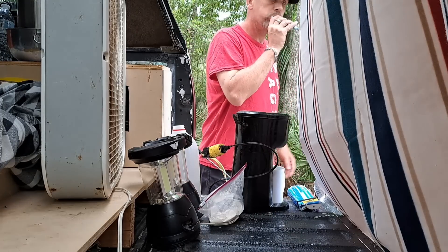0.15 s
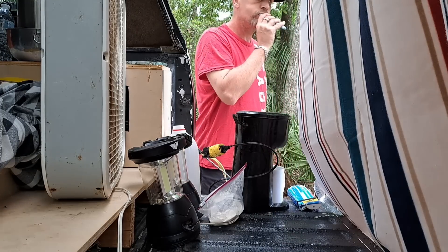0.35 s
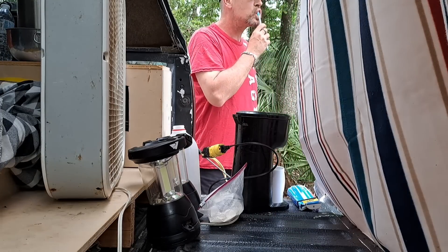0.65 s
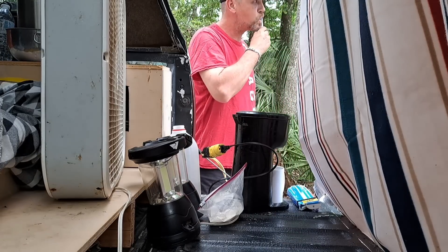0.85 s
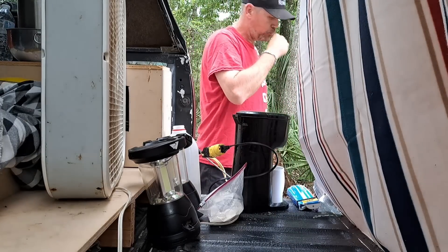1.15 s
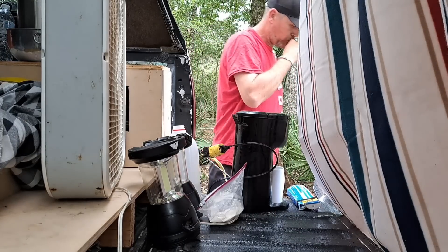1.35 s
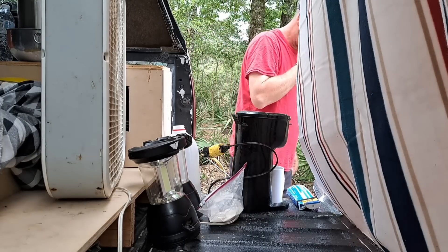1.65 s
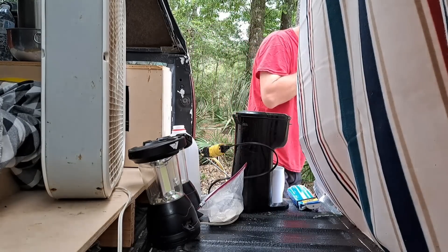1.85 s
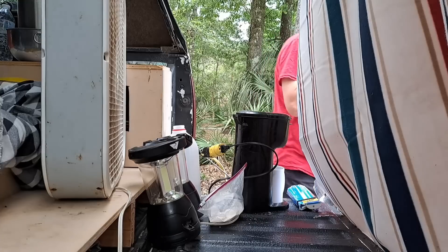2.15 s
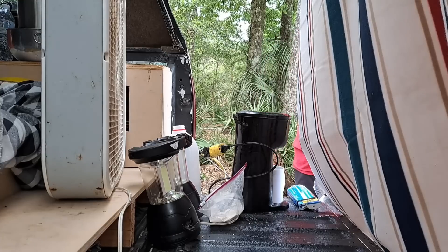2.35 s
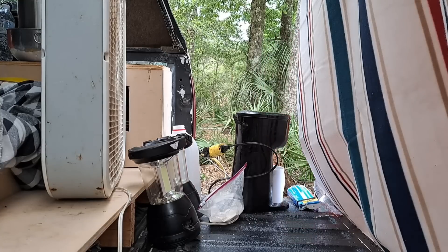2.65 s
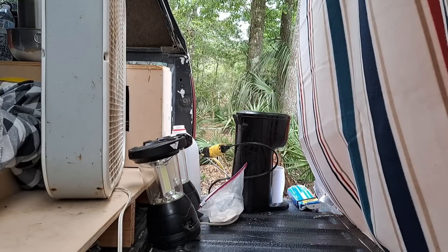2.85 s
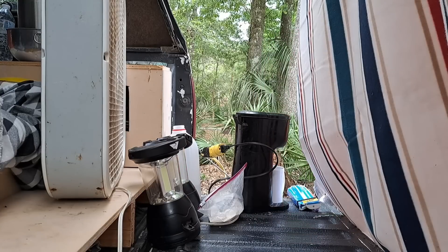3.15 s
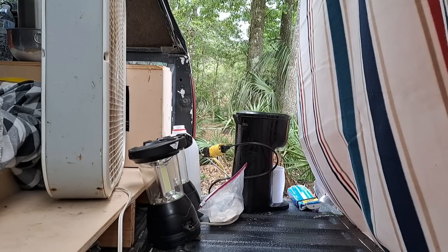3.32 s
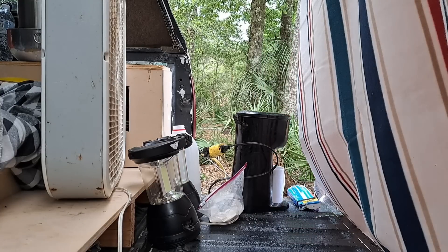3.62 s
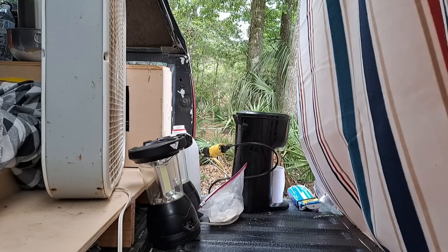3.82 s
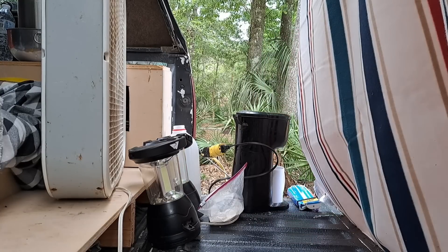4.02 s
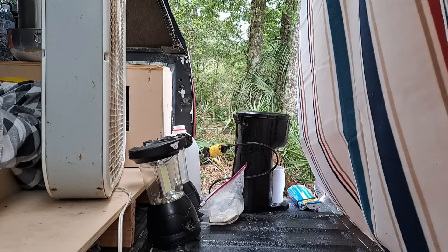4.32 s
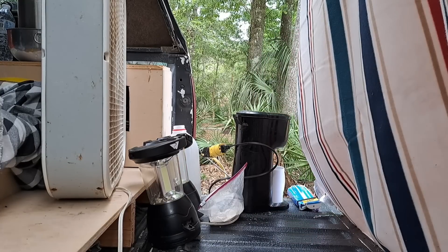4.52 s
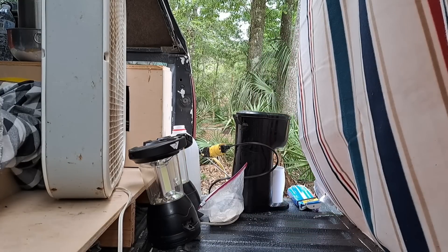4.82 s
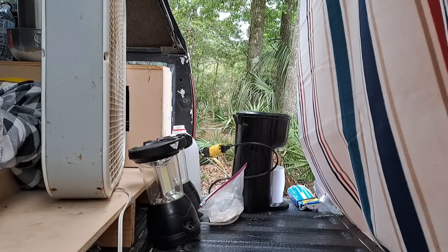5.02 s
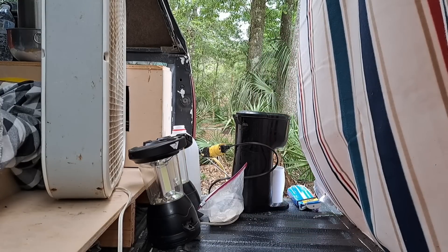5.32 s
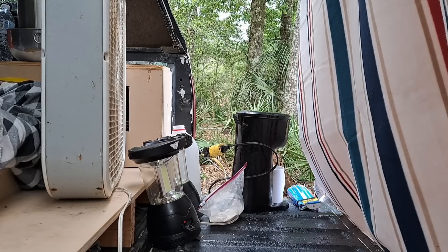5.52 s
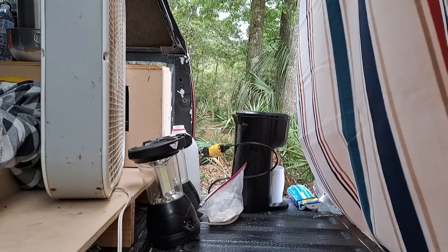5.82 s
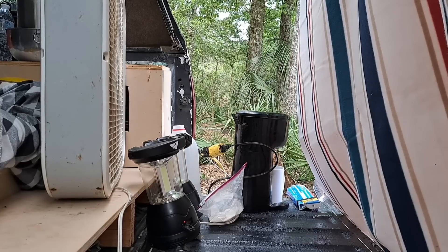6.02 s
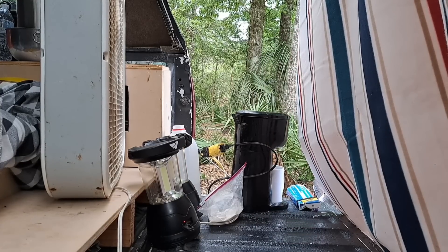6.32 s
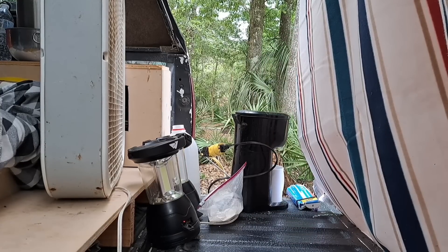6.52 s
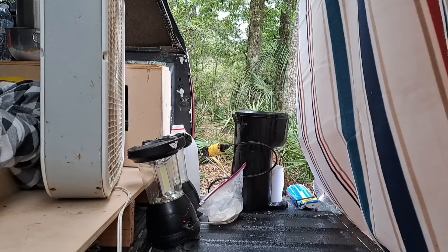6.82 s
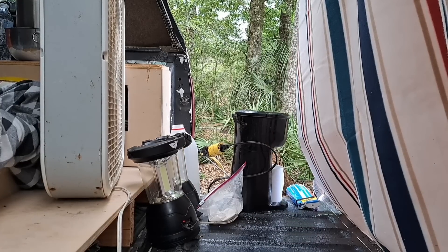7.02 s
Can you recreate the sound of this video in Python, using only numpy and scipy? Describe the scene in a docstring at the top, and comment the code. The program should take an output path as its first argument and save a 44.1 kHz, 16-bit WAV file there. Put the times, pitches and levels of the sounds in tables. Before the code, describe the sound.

Close, wavering steam-like singing from a heating coffee maker, with fizz, pops and small gurgles, while a motor whirrs and footsteps rustle away through leaves.

```python
"""Coffee maker and motor outdoors

A drip coffee maker heats on a tailgate: collapsing steam bubbles excite its heater tube, which sings near
1.3 kHz and slowly brightens, amid fizz, ticks, knocks, glugs and sputters made of filtered pulses and tones.
A motor close by drones and whirrs in multiples of its turn rate, gains a little speed and makes the singing
flutter. A low hum (sines of fixed pitch and wavering level), an air rush, a fading rustle of someone walking
off and hiss (filtered noise) lie below."""
import sys
import numpy as np
from scipy import signal
from scipy.fft import rfft, irfft, next_fast_len
from scipy.io import wavfile
from scipy.ndimage import map_coordinates

SR = 44100
rng = np.random.default_rng(int(sys.argv[2]) if len(sys.argv) > 2 else 0)


def bounce(signal):
    """Save signal as a 16-bit WAV file at the path given by the first command-line argument."""
    frames = np.transpose(np.atleast_2d(signal))
    limited = np.clip(frames, -1, 1)
    pcm = np.round(limited * 32767).astype(np.int16)
    wavfile.write(sys.argv[1], SR, pcm)


N = 315756

WARM_UP_S = 7.16  # the tube goes from cool to hot at an even pace
# share of one turn's bubbling that returns in the next (0-1), at first and at last; e-fold time of its growth
LOCKED_FIRST, LOCKED_LAST, LOCKING_S = 0.019, 0.94, 1.3
# evening of the swells: usual share, share inside the strongest cluster, half the averaging window
EVENING, CLUSTER_EVENING, EVENING_S = 0.42, 0.6, 0.0055
# hold-back of the singing while a knocking bubble grows: depth, time before the knock, half-width
LULL_DB, LULL_LEAD_S, LULL_S = -10, 0.004, 0.007
# half-width of a swell in the boil, and the share of its dB lift that the singing follows
BOIL_UP_S, SINGING_FOLLOWS = 0.85, 0.29
# resonance of the cool tube: f/Hz, relative level/dB per Hz
COOL_TUBE = [(700, -47), (1020, -26), (1090, -20), (1170, -6.5), (1215, -7.5), (1275, 5.5), (1380, -1.5),
             (1470, -11.5), (1550, -7.5), (1630, -20.5), (1740, -15.5), (1870, -28), (2200, -37.5),
             (4000, -77.5)]
# resonance of the hot tube: f/Hz, relative level/dB per Hz
HOT_TUBE = [(800, -37.5), (1080, -35.5), (1135, -21), (1215, -25.5), (1252, -2.5), (1290, -0.2),
            (1340, -2.5), (1450, -1), (1495, -8), (1560, -2), (1630, -19.5), (1745, -20), (1850, -26),
            (1950, -29.5), (4000, -99)]
# clusters of bubbles that collapse together: t/s, lift of the singing/dB, lift of the fizz/dB
CLUSTERS = [(.172, 3, 0), (.276, 3, 0), (.608, 4, 1), (.66, 3, 1), (.784, 4.5, 1), (1.33, 3, 0),
            (1.41, 3.5, 0), (2.117, 3.8, 0), (2.504, 3.8, 0), (2.9, 4, 0), (2.97, 4, 0), (3.432, 3.5, 0),
            (3.663, 3.5, 0), (3.799, 3, 0), (4.24, 2.5, 0), (5.011, 4.5, 1), (5.593, 3, 0),
            (6.272, 1.5, 1.5)]
# moments when the boiling slackens: t/s, change of the singing/dB, change of the fizz/dB
STALLS = [(0, -2.5, -2), (.38, -2, 0), (.44, -2, -.5), (.71, -2.5, -4), (.86, 0, -2.5), (1.47, -2, 0),
          (2.3, -2, 0), (3.03, -2.5, 0), (3.12, -2.5, 0), (3.35, -2, 0), (4.32, -2.3, -1), (5.32, -3, -1),
          (5.53, 0, -2.3), (5.8, 0, -1.5), (6.01, 0, -2)]
# moments when the boil picks up: t/s, lift of the fizz/dB
BOIL_UPS = [(2.2, 0.82), (6.6, 1.2)]


def singing(turns, flutter=0.14, late_flutter=0.18, throb=0.22):
    """Forced resonance: collapsing bubbles ring the tube, and the motor's shaking times a growing share."""
    t = np.arange(N) / SR
    heat = np.clip(t / WARM_UP_S, 0, 1)
    locked = LOCKED_FIRST + (LOCKED_LAST - LOCKED_FIRST) * np.exp((t - t[-1]) / LOCKING_S)
    drive = recurring(turns, locked) * shaking(turns, flutter + late_flutter * heat, order=6)

    # as the water warms, the upper resonances take over
    cool = unit(ports(coloured(drive, COOL_TUBE)))
    hot = unit(ports(coloured(drive, HOT_TUBE)))
    song = (1 - heat) * cool + heat * hot

    # strong ringing uses up the ripe bubbles, which evens out the swells, most of all inside a cluster
    surges = swells([(s, db) for s, db, _ in CLUSTERS], width=0.009)
    window = np.hanning(int(2 * EVENING_S * SR))
    power = np.abs(signal.fftconvolve(song.mean(0) ** 2, window, "same"))
    even = EVENING + (CLUSTER_EVENING - EVENING) * surges / surges.max()
    song = unit(song / (power / power.mean() + 0.08) ** (even / 2))

    song = song * shaking(turns, throb * (1 - heat), order=2)  # a slower throb fades with the warming
    lulls = swells([(s - LULL_LEAD_S, LULL_DB) for s, _ in KNOCKS], LULL_S)
    stalls = swells([(s, db) for s, db, _ in STALLS], width=0.024)
    boil = SINGING_FOLLOWS * swells(BOIL_UPS, BOIL_UP_S)
    level = settling(first_db=-37.5, steady_db=-34, time_s=0.46)
    return amp(level + boil + surges + lulls + stalls + 0.29 * wobble(30)) * song


# single large collapses: t/s, strength/dB (the loudest ringing peak is set to the strongest)
KNOCKS = [(.596, -26.5), (.741, -26), (.843, -25.5), (2.323, -25.5), (2.401, -27.5), (3.106, -27),
          (4.218, -24.5), (4.582, -24.5)]


def knocks():
    """Impulse response: each large collapse strikes the tube, which rings with its cool resonances."""
    blows = np.zeros((2, N))
    for s, db in KNOCKS:
        blows[0, int(s * SR)] = amp(db)
    ring = ports(coloured(blows, COOL_TUBE))
    return ring * blows.max() / np.abs(ring.mean(0)).max()


# ringing of the heater plate and housing:
# f/Hz, bandwidth/Hz, relative level when cool/dB, change when hot/dB
HOUSING = [(2098, 180, -2.5, -.5), (2435, 55, 6, -3.5), (2660, 110, -4.5, .5), (2910, 200, -1, .5),
           (3615, 75, 1.5, -.5), (3960, 130, 0, 2), (4120, 60, -4, 4.5), (4250, 110, -10, 1),
           (4745, 80, -5, .5), (5000, 150, -8, -1), (5410, 50, -1.5, 1), (5780, 120, -15.5, 0),
           (6110, 45, -12, 0), (6250, 70, -10.5, -.5), (7130, 110, -17, -1), (7430, 90, -10.5, -.5),
           (7790, 80, -11, 0)]


def fizz(turns, throb=0.13, edge_hz=8000):
    """Modal excitation: the smallest bubbles, in clumps, ring the plate and housing mode by mode."""
    drive = collapses(rate=12000, scatter_db=4.0) * amp(0.95 * wobble(45))
    drive = drive * shaking(turns, throb, order=2)
    ring, heat = 0, np.clip(np.arange(N) / SR / WARM_UP_S, 0, 1)
    for hz, width, db, change in HOUSING:
        mode = signal.lfilter(*signal.iirpeak(hz, hz / width, SR), drive)
        strength = amp(db + change * heat + 1.06 * wobble(16))
        ring = strength * mode - ring  # neighbouring modes swing in opposite directions
    ring = filtered(ring, lambda hz: 1 / np.sqrt(1 + (hz / edge_hz) ** 40))
    surges = swells([(s, db) for s, _, db in CLUSTERS], width=0.021)
    stalls = swells([(s, db) for s, _, db in STALLS], width=0.026)
    level = settling(first_db=-61, steady_db=-56, time_s=0.34)
    return amp(level + swells(BOIL_UPS, BOIL_UP_S) + surges + stalls) * unit(ports(ring))


# faint pops: strongest at the start, range below it, fall as the water warms
FAINT_POP_DB, FAINT_RANGE_DB, FAINT_FALL_DB_PER_S = -57, 10, 0.9
# individually timed pops, mostly louder than the faint ones: t/s, burst level before colouring/dB
POPS = [(0.1042, -50), (0.172, -48), (0.2324, -49.5), (0.296, -49), (0.596, -47.5), (0.6514, -51.5),
        (0.9213, -49), (1.07, -57), (1.228, -48), (1.4611, -51), (1.532, -50.5), (1.8074, -53.5),
        (2.0163, -55), (2.568, -47), (2.6948, -51), (2.8938, -49), (3.1842, -51.5), (3.5997, -52.5),
        (3.8606, -51.5), (4.6386, -44.5), (4.8045, -57), (5.0345, -49.5), (5.4595, -52.5), (6.5206, -50)]
# colour of a pop: f/Hz, relative level/dB per Hz
POP_COLOUR = [(500, -38), (1500, -6), (3000, -13), (4000, -18), (5800, -10), (6300, 4), (7000, 5),
              (7800, 7), (8500, -12), (11000, -15), (15000, -18)]


def pops(count=240):
    """Transient radiation: bubbles burst as bright ticks, some timed, many faint that weaken with warming."""
    moment, weakness = rng.random(size=(count, 2)).T
    s = moment * N / SR
    faint_db = FAINT_POP_DB - FAINT_RANGE_DB * weakness - FAINT_FALL_DB_PER_S * s
    timed = bursts(POPS, t60=0.042, rise=0.0036)
    faint = bursts(np.column_stack([s, faint_db]), t60=0.074, rise=0.0017)
    return struck(timed + faint, POP_COLOUR)


# short ringing blips; the three near 0.294 s together make one click:
# t/s, f/Hz, starting level before attack and panning/dB, t60/s
BLIPS = [(.103, 4760, -51, .04), (.14, 4480, -59, .2), (.229, 4780, -52, .04), (.295, 3080, -43.5, .045),
         (.294, 2780, -45, .02), (.293, 2480, -44, .04), (1.011, 4790, -51, .06), (3.458, 4770, -50, .05),
         (3.905, 4750, -47, .05), (5.661, 5410, -53, .05), (6.229, 4770, -53, .06)]


def blips(attack=0.0008):
    """Damped oscillation: each short blip is a decaying sine of unsteady phase."""
    out = np.zeros(N)
    for s, hz, db, t60 in BLIPS:
        t = np.maximum(np.arange(N) / SR - s, 0)
        envelope = amp(db - 60 * t / t60) * (1 - np.exp(-t / attack))
        out += envelope * np.sin(2 * np.pi * hz * t + 0.7 * wobble(300))
    return out * amp([[-2], [2]])  # stronger at the right


# pitch swing of a glug either side of its middle (share), and spread of its phase waver (radians)
GLUG_RISE, GLUG_ROUGH = 0.13, 0.6
# air pockets in the tube: t at the peak/s, f at the peak/Hz, relative peak level/dB, rise/s
GURGLES = [(.132, 350, -40, .004), (.171, 560, -45, .005), (.283, 370, -40, .005), (.296, 510, -45, .006),
           (.518, 370, -41, .006), (.68, 620, -45, .006), (.741, 350, -38.5, .009), (.76, 520, -44, .007),
           (1.303, 350, -42, .005), (1.42, 330, -42, .009), (1.789, 400, -41, .005),
           (2.43, 330, -42.5, .005), (2.586, 350, -43, .007), (2.71, 390, -41, .009),
           (2.868, 370, -40, .003), (3.009, 590, -44, .005), (3.014, 350, -39.5, .004),
           (3.203, 400, -38.5, .009), (3.243, 400, -43, .005), (3.488, 590, -47, .006),
           (3.856, 350, -43, .005), (3.966, 350, -40, .007), (4.108, 320, -41.5, .006),
           (4.173, 650, -48, .005), (4.231, 370, -41.5, .004), (4.315, 540, -48, .008),
           (4.48, 660, -47, .007), (4.572, 400, -42.5, .009), (4.712, 350, -41.5, .004),
           (5.838, 340, -42.5, .005), (6.411, 360, -40, .005), (6.518, 460, -42.5, .004),
           (6.562, 360, -42, .008), (6.831, 380, -42, .004), (6.83, 630, -47, .005),
           (6.998, 330, -41.5, .007)]


def gurgling(level_db=0.5):
    """Cavity resonance: each air pocket swells, rings for a few cycles and rises in pitch as it dies."""
    out, t = np.zeros(N + SR), np.arange(SR // 10) / SR
    for s, hz, db, rise in GURGLES:
        age = t / rise
        pitch = hz * (1 + GLUG_RISE * np.tanh((age - 1) / 2))
        cycles = np.cumsum(pitch) / SR + rng.random()
        waver = GLUG_ROUGH * np.interp(t, np.linspace(0, t[-1], 20), rng.standard_normal(20))
        envelope = amp(db + level_db) * age * np.exp(1 - age)  # peaks at age 1
        out[int((s - rise) * SR):][:len(t)] += envelope * np.sin(2 * np.pi * cycles + waver)
    return ports(np.array([out[:N], np.zeros(N)]))


# soft flurries of steam: t at the middle/s, f/Hz, relative level/dB
SPUTTERS = [(1.83, 3300, -61.5), (1.98, 2800, -60), (2.07, 3000, -61), (2.51, 3050, -57.5),
            (3.17, 3350, -62), (3.25, 3600, -58.5), (4.93, 2900, -62), (6.13, 3100, -59.5),
            (6.272, 3900, -60), (6.412, 3300, -61.5), (6.52, 3050, -59), (7.027, 2950, -57.5)]


def sputtering(length_s=0.041, spread=0.13):
    """Band-limited shot noise: flurries of tiny bubbles; spread is their scatter as a share of the pitch."""
    out, t = np.zeros((2, N + SR)), np.arange(-SR // 8, SR // 8) / SR
    shape, f = np.exp(-(t / length_s) ** 2), np.fft.rfftfreq(len(t), 1 / SR)
    spray = collapses(rate=1500, scatter_db=1)
    for s, hz, db in SPUTTERS:
        start = int((s + t[0]) * SR)
        band = np.exp(-((f / hz - 1) / spread) ** 2)
        puff = irfft(rfft(shape * spray[:, start:][:, :len(t)]) * band, len(t))
        puff *= np.sqrt(np.mean(shape ** 2)) / np.std(puff, axis=1, keepdims=True)
        out[:, start:][:, :len(t)] += amp(db) * puff
    return ports(out[:, :N])


# the motor's turns a second at first and at full speed, time taken, exponent of the approach
FIRST_TURNS_HZ, FULL_TURNS_HZ, RUN_UP_S, EASE = 24.4, 26.29, 7.16, 2.5


def run_up():
    """Decelerating approach: how far the motor has come towards full speed, 0-1."""
    return 1 - np.clip(1 - np.arange(N) / SR / RUN_UP_S, 0, 1) ** EASE


def shaft(unsteady=0.0008):
    """Phase as integrated speed: turns that the motor has made so far."""
    speed = FIRST_TURNS_HZ + (FULL_TURNS_HZ - FIRST_TURNS_HZ) * run_up()
    return np.cumsum(speed * (1 + unsteady * wobble(14))) / SR


# motor orders: multiple of the turn rate, rms level before panning at first speed/dB and at full speed/dB
DRONE = [(6, -74, -63.5), (8, -59.5, -55.5), (10, -67, -66), (12, -60.5, -57), (14, -61, -64),
         (16, -59, -63.5), (19, -76.5, -65), (20, -52.5, -67), (21, -60, -77.5), (22, -67.5, -69),
         (32, -64, -72), (36, -74, -72)]
# low hum tones: f/Hz, middle rms level before panning/dB
HUM = [(60, -69), (120, -57), (167, -66)]


def drone(turns):
    """Harmonic orders: sines locked to the shaft shift in strength with speed; hum tones keep their pitch."""
    t, pace = np.arange(N) / SR, run_up()

    def tone(db, cycles):
        return amp(db) * np.sqrt(2) * np.sin(2 * np.pi * (cycles + rng.random()))

    orders = sum(tone(slow + (fast - slow) * pace + 0.97 * wobble(7), k * turns) for k, slow, fast in DRONE)
    hum = sum(tone(db + 2.1 * wobble(9), hz * t) for hz, db in HUM)
    return filtered(orders + hum, lambda hz: amp(along(PAN, hz) / 2 * np.array([[1], [-1]])))


WHIRR_REPEATS_FIRST, WHIRR_REPEATS_LAST = 0.5, 0.87  # likeness of one turn to the next (0-1)
# whirr at full speed: f/Hz, relative level/dB per Hz
WHIRR = [(250, -33), (470, -11.5), (535, 2.5), (575, 0.5), (610, -4.5), (720, -5.5), (850, -4),
         (910, -11.5), (945, -2), (1010, -11.5), (1130, -1.5), (1400, -29), (4000, -90.5)]


def whirr(turns):
    """Cyclic noise: the motor's airy whirr, rough at first, then higher and more alike on every turn."""
    pace = run_up()
    lower = [(hz * FIRST_TURNS_HZ / FULL_TURNS_HZ, db) for hz, db in WHIRR]
    slow = coloured(recurring(turns, WHIRR_REPEATS_FIRST), lower)
    fast = coloured(recurring(turns, WHIRR_REPEATS_LAST), WHIRR)
    blend = np.sqrt(1 - pace) * slow + np.sqrt(pace) * fast
    return amp(settling(first_db=-50, steady_db=-60, time_s=2.2)) * unit(ports(blend))


# low rush of moving air: f/Hz, relative level/dB per Hz
RUSH = [(20, -20.5), (40, -22), (58, -4.5), (85, -13.5), (125, -3.5), (240, -4.5), (320, 2.5), (420, .5),
        (470, -4), (510, -5), (600, -7.5), (800, -12.5), (1050, -18), (2500, -20), (6000, -99)]


def rush():
    """Flow noise: stirred air rushes low, in soft lumps, as filtered noise of wavering level."""
    air = unit(ports(coloured(rng.standard_normal((2, N)), RUSH)))
    return amp(settling(first_db=-46, steady_db=-50, time_s=2.35) + 0.95 * wobble(26)) * air


# colour of the leaves: f/Hz, relative level/dB per Hz
LEAVES = [(500, -20), (2500, 0), (6000, 1), (8700, -4), (9450, 0), (10500, -2), (11500, -1), (11950, 5),
          (13000, 0), (15500, -2)]
# leaves brushed in passing: t/s, lift of the rustle/dB
BRUSHES = [(.27, 2.5), (1.01, 4), (3.53, 7.5)]
# crisp crackles underfoot: t/s, relative burst level/dB
CRACKLES = [(0.042, -50.5), (0.1032, -57.5), (0.194, -50.5), (0.2438, -55.5), (.281, -54.5), (0.2952, -54),
            (0.4194, -52.5), (.493, -54), (0.5062, -47), (.516, -47.5), (0.5945, -55), (0.7058, -54),
            (1.6726, -53), (1.7389, -54), (3.272, -50), (3.4895, -55.5), (3.5354, -55.5), (3.5877, -60)]
# colour of a crackle: f/Hz, relative level/dB per Hz
CRISP = [(2000, -36.5), (6000, -9), (9000, -2.5), (11000, -2), (12000, 7.5), (13000, -2), (15500, -3)]


def rustle():
    """Granular contact noise: a leafy rustle settles as the steps move away, with a few crisp crackles."""
    grains = collapses(rate=4000, scatter_db=1.5) * amp(1.6 * wobble(43))
    level = settling(first_db=-65.5, steady_db=-83, time_s=3.6) + swells(BRUSHES, width=0.06)
    leaves = amp(level) * unit(ports(coloured(grains, LEAVES)))
    return leaves + struck(amp(-5.5) * bursts(CRACKLES, t60=0.05, rise=0.001), CRISP)


# colour of the hiss: f/Hz, relative level/dB per Hz
HISS = [(1000, 9.5), (7000, -2), (8700, -12.5), (11000, -11.5), (12500, -8), (14000, -9), (15700, -8.5)]


def hiss():
    """Stationary noise: the even, faint hiss behind everything."""
    return amp(-60.5) * unit(ports(coloured(rng.standard_normal((2, N)), HISS)))


LAG_S = 0.00043  # the sound reaches the left port this much later
# level difference between the microphone ports: f/Hz, left minus right/dB
PAN = [(60, -2.5), (300, -.5), (490, 0), (620, -7), (850, -4), (950, 7), (1030, 0), (1170, 2), (1240, -6),
       (1550, -7), (1620, 0), (1850, -11), (2200, -2), (3700, -6), (6200, -3), (7500, -8), (9000, 1),
       (11500, 7), (15000, 3)]
# bend of the delay by nearby surfaces: f/Hz, phase lead of the left/radians
LEAD = [(60, .1), (300, 0.77), (550, 0.74), (900, 2.75), (1100, 1.1), (1200, 1.2), (1270, 2.3), (1480, 2.8),
        (1600, 3.04), (1680, 6.9), (2100, 6.35), (3000, 5.97)]
# likeness of the two ports: f/Hz, coherence (0-1)
ALIKE = [(60, 0.72), (300, 0.92), (800, 0.59), (1000, 0.84), (1150, 1), (1290, 1), (1550, 0.78),
         (1900, 0.39), (6000, 0.18), (12000, .1)]


def ports(pair):
    """Spatial coherence: two unrelated signals become direct and scattered sound at two ports."""
    def response(hz):
        turn = np.arccos(np.clip(along(ALIKE, hz), 0, 1)) / 2
        phase = along(LEAD, hz) / 2 - np.pi * hz * LAG_S
        tilt = amp(along(PAN, hz) / 2) * np.exp(1j * phase)
        direct = np.cos(turn) * np.array([tilt, 1 / tilt])
        scattered = np.sin(turn) * np.array([tilt, -(1 / tilt)])
        middle = np.hypot(abs(direct.mean(0)), abs(scattered.mean(0)))
        return np.array([direct, scattered]) / middle
    return filtered(pair[:, None], response).sum(0)


def recurring(turns, likeness, size=1680):
    """Cyclostationarity: noise in which every turn of the motor partly repeats the turn before it."""
    laps = rng.standard_normal((int(turns[-1]) + 1, 2, size))
    keep = np.interp(np.arange(len(laps)), turns, np.clip(likeness * np.ones(N), 0, 0.99))
    for k in range(1, len(laps)):
        laps[k] = keep[k] * laps[k - 1] + np.sqrt(1 - keep[k] ** 2) * laps[k]
    return np.concatenate(laps, axis=1)[:, (turns * size).astype(int)]


def shaking(turns, depth, order):
    """Amplitude modulation: a gain that swings order times in each turn of the motor."""
    return 1 + depth * np.cos(2 * np.pi * order * turns)


def collapses(rate, scatter_db):
    """Shot noise: pulses at random moments, rate a second, with randomly scattered sizes."""
    strikes = (rng.random(N) < rate / SR) * amp(scatter_db * np.clip(rng.standard_normal(N), -2, 2))
    return unit(strikes * rng.standard_normal((2, N)))


def bursts(events, t60, rise):
    """Energy superposition: short puffs of noise, one for each (t/s, level/dB) row."""
    power, t = np.zeros(N), np.arange(SR // 8) / SR
    for s, db in events:
        power[int(np.clip(s * SR, 0, N - 1))] += amp(db) ** 2
    puff = amp(-60 * t / t60) * (1 - np.exp(-t / rise))
    envelope = np.sqrt(np.abs(signal.fftconvolve(power, puff ** 2)[:N]))
    return envelope * rng.standard_normal((2, N))


def struck(x, spectrum):
    """Spectral shaping at constant level: colour a train of bursts and keep its rms."""
    return np.std(x) * unit(ports(coloured(x, spectrum)))


def swells(rows, width):
    """Gaussian level changes: a dB curve with one bump of 1/e half-width/s per (t/s, lift/dB) row."""
    t = np.arange(0, N / SR, 0.001)
    bumps = sum(db * np.exp(-((t - s) / width) ** 2) for s, db in rows)
    return np.interp(np.arange(N) / SR, t, bumps)


def settling(first_db, steady_db, time_s):
    """Exponential relaxation: a dB curve from its first value towards a steady one."""
    return steady_db + (first_db - steady_db) * np.exp(-np.arange(N) / SR / time_s)


def wobble(rate):
    """Slow random modulation: a smooth curve with rate knots a second."""
    knots = rng.standard_normal(int(N * rate / SR) + 4)
    return map_coordinates(knots, [np.arange(N) * rate / SR])


def coloured(x, spectrum):
    """Minimum phase: a causal filter with the given spectrum rings after a pulse, never before."""
    def response(hz):
        cepstrum = irfft(np.log(amp(along(spectrum, hz))))
        index = np.arange(len(cepstrum))
        fold = 1 + np.sign(len(cepstrum) // 2 - index)  # keep the causal half, doubled
        return np.exp(rfft(cepstrum * fold))
    return unit(filtered(x, response))


def filtered(x, response):
    """Linear filtering: the spectrum of x times a complex response of frequency."""
    m = next_fast_len(N + SR // 2, True)
    return irfft(rfft(x, m) * response(np.fft.rfftfreq(m, 1 / SR)), m)[..., :N]


def along(points, hz):
    """Logarithmic frequency scale: (f/Hz, value) points read on a log axis."""
    f, v = np.transpose(points)
    return np.interp(np.log(hz + 1), np.log(f + 1), v)


def unit(x):
    """Level normalisation: scale to rms 1, a stereo pair by its middle."""
    return x / np.sqrt(np.mean(np.atleast_2d(x).mean(0) ** 2) + 1e-20)


def amp(db):
    """Decibel law: level to amplitude gain."""
    return 10 ** (np.asarray(db) / 20)


def scene():
    """Superposition: coffee maker, motor with hum, and surroundings add up."""
    turns = shaft()
    tube = singing(turns) + knocks()
    bubbles_and_blips = fizz(turns) + pops() + blips() + gurgling() + sputtering()
    motor_and_hum = drone(turns) + whirr(turns)
    return tube + bubbles_and_blips + motor_and_hum + rush() + rustle() + hiss()


def record(dry, top_hz=15720):
    """Band limiting: nothing at or above top_hz is kept."""
    return filtered(dry, lambda hz: hz < top_hz)


dry = scene()
out = record(dry)
bounce(out)
```